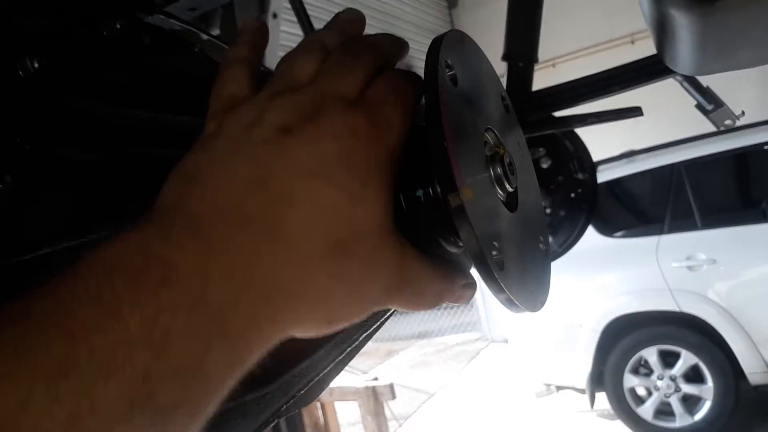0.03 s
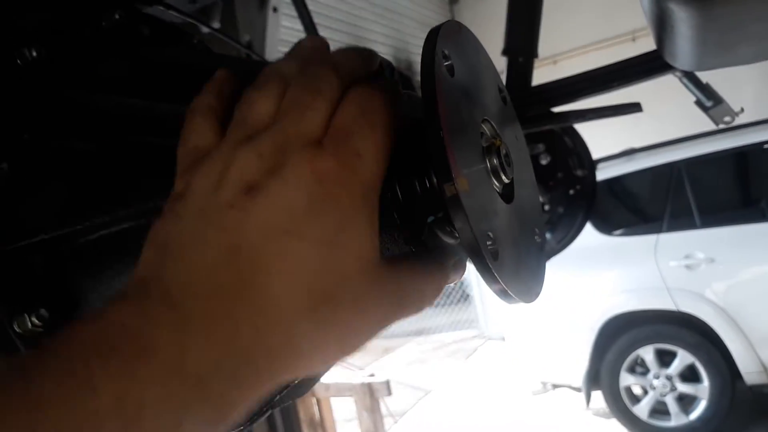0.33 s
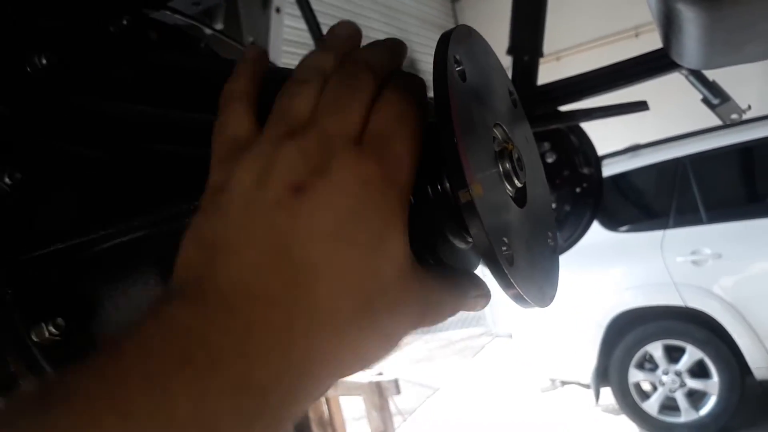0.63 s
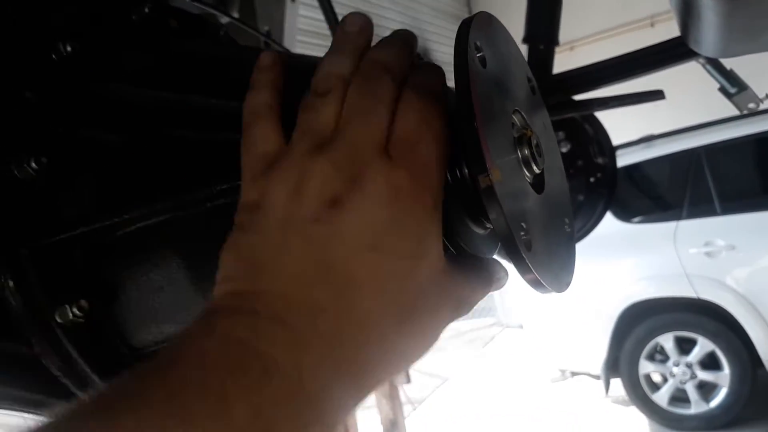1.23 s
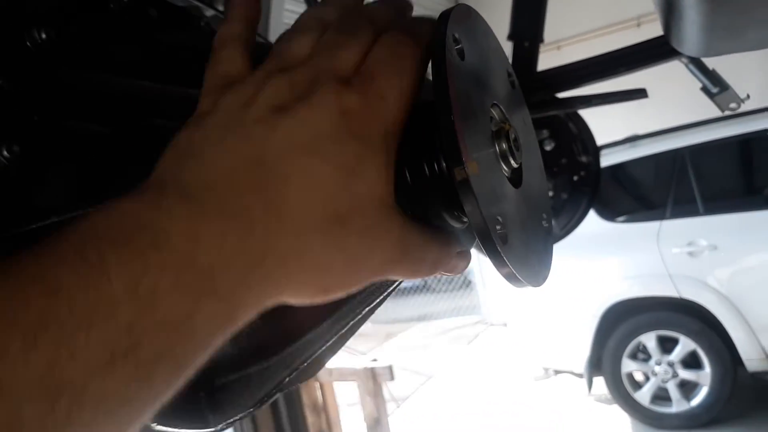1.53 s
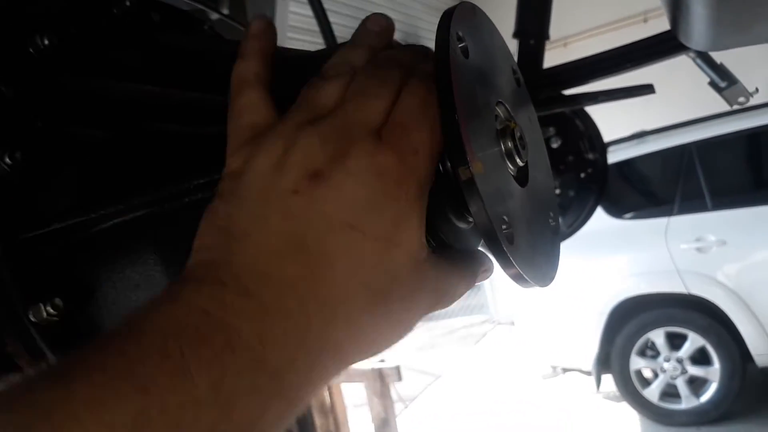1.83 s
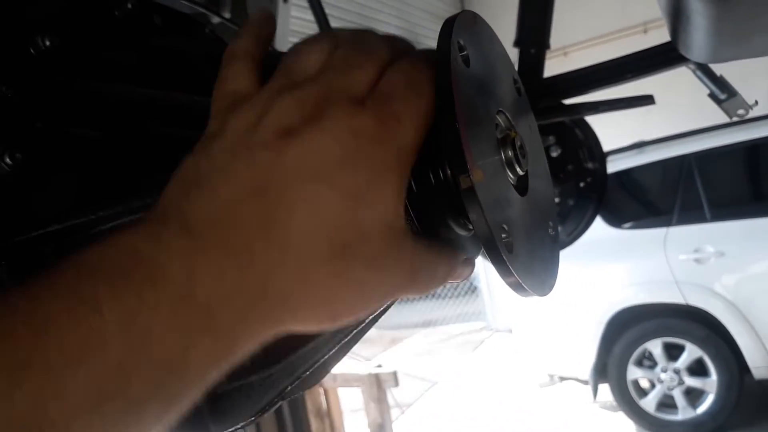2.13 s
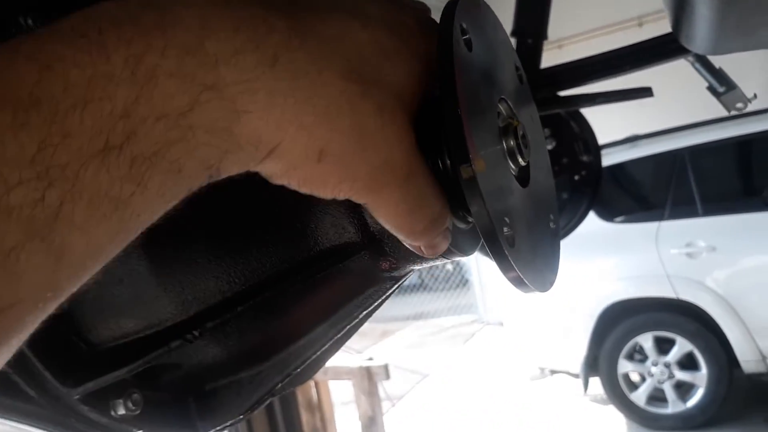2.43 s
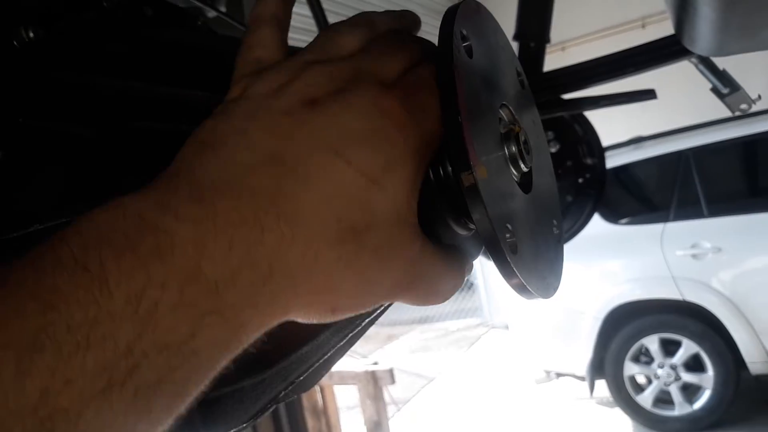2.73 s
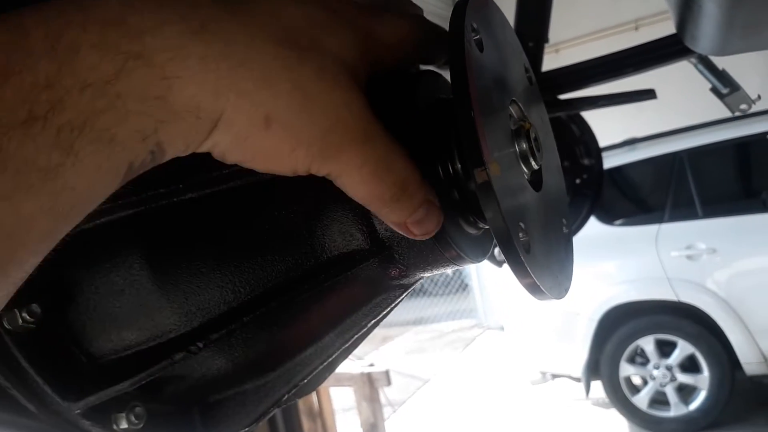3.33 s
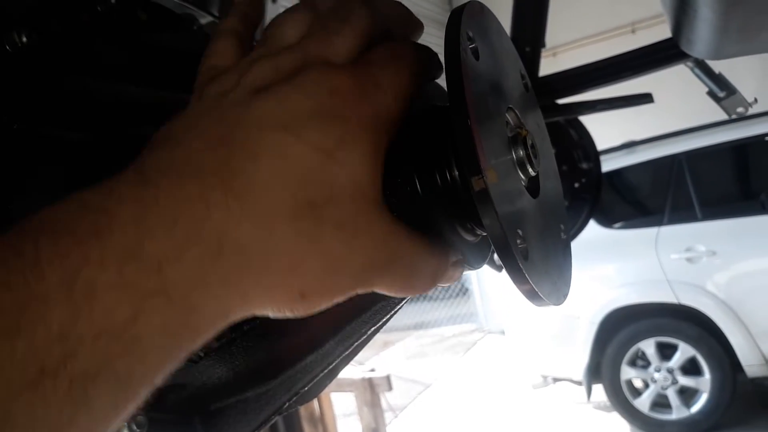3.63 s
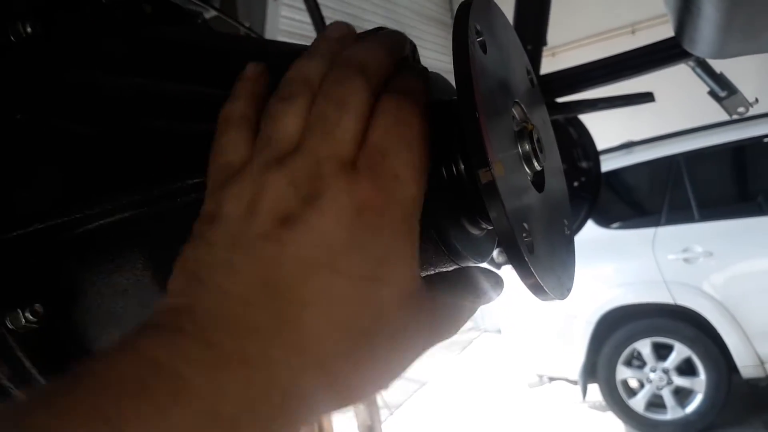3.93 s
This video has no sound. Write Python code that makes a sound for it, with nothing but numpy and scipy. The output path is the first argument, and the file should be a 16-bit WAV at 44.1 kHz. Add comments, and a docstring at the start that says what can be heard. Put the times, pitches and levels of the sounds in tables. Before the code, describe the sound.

Short metal squeaks from a hand-twisted steel flange over a soft ventilation roar.

```python
"""In a workshop, under a vehicle, a hand twists a steel flange back and forth close by.
The dry joint sticks and slips in four short squeaks that ring the metal. The palm brushes the steel,
there is one faint tick, and near the end comes one hissing scuff.
Behind it all the ventilation roars softly, with a hum and a thin whine."""
import sys
import numpy as np
from scipy import signal
from scipy.fft import rfft, irfft
from scipy.io import wavfile
from scipy.ndimage import uniform_filter1d

SR = 44100
rng = np.random.default_rng(int(sys.argv[2]) if len(sys.argv) > 2 else 0)


def waveform_to_disk(signal):
    """Save audio, clipped to [-1, 1], as 16-bit WAV at the path in sys.argv[1]."""
    frames = np.transpose(np.atleast_2d(signal))
    scaled = np.clip(frames, -1, 1) * 32767
    samples = np.round(scaled).astype(np.int16)
    wavfile.write(sys.argv[1], SR, samples)


N = 176400  # 4 seconds

# The tone colour of the fan's roar: frequency_hz, gain_db
ROAR_COLOUR = [(15, -61), (25, -37.5), (108, -11.5), (145, -11.5), (229, -8), (285, -0.5), (405, -5),
               (451, -3), (531, -6.5), (575, -14), (754, -4.5), (818, -11), (911, -11.5), (1100, -0.5),
               (1230, -2.5), (1520, -10), (2280, -5), (2760, -7), (3080, -13.5), (4490, -17.5),
               (5000, -21.5), (6210, -23.5), (7510, -38), (11900, -36), (16000, -48)]
# How loud the roar is: time_s, level_db
ROAR_LEVEL = [(0, -33.5), (.45, -37.5), (.95, -36), (1.3, -34), (1.65, -31), (2.3, -30.5), (2.8, -30.5),
              (3.3, -30.5), (4, -31)]
# How alike the roar is in both ears (1 is the same): frequency_hz, likeness
ROAR_LIKENESS = [(60, 1), (130, .98), (300, 0.97), (480, 0.87), (700, -0.069), (1400, -.25), (3100, -0.12),
                 (6800, 0.083), (15000, -0.14)]
# Which way the roar leans: frequency_hz, left_minus_right_db
ROAR_PAN = [(130, 0.5), (290, 0), (640, -1.5), (1400, -2.5), (3100, -4), (6800, 2.5), (15000, -1)]
# The tones of the hum: pitch_hz, level_db, right_ear_lag_turns
HUM_TONES = [(57, -81, 0), (108, -70.5, 0.07), (122.2, -58.5, 0), (769.3, -45, 0.25)]
# The tones of the whine, compared with the strongest: pitch_hz, gain_db
WHINE_TONES = [(5383, -5.5), (5502, -6), (6035, -4), (6153, 0), (6270, -6), (6690, -9), (6804, -12),
               (6920, -11), (7050, -17)]
# How loud the strongest whine tone is: time_s, level_db
WHINE_LEVEL = [(0, -60), (.5, -56.5), (1.1, -57), (1.5, -54.5), (1.9, -49.5), (2.4, -55.5), (2.8, -52),
               (3.6, -66), (4, -58)]

# The path of each squeak (its pitch is the slips per second): time_s, pitch_hz, level_db
LONG_SQUEAK = [(.052, 1440, -17), (.056, 1345, -12), (.063, 1285, -11.5), (.069, 1222, -15),
               (.081, 1165, -13), (.090, 1090, -11), (.098, 995, -8.5), (.109, 928, -14), (.123, 838, -9.5),
               (.129, 802, -14), (.137, 785, -10), (.150, 738, -17), (.162, 672, -17), (.169, 650, -27)]
THIN_SQUEAK = [(1.346, 1631, -22), (1.351, 1438, -24), (1.357, 1674, -30), (1.365, 1672, -18.5),
               (1.372, 1733, -24), (1.381, 1730, -27), (1.393, 1735, -26), (1.409, 1730, -28.5)]
FIRST_CHIRP = [(2.587, 1150, -25), (2.591, 1010, -18), (2.595, 955, -16.5), (2.602, 915, -19),
               (2.607, 900, -25)]
SECOND_CHIRP = [(2.621, 1090, -25), (2.624, 1040, -19), (2.630, 935, -17.5), (2.635, 880, -17.5),
                (2.642, 853, -15.5), (2.649, 845, -24)]
# The joint's tone colour in a hard grip, a light touch and a quick jerk: frequency_hz, gain_db
METAL = [(300, -60), (700, -21), (1000, -24), (1180, -6), (1450, -12.5), (1700, -15.5), (2300, -8),
         (2600, -18.5), (3350, -10), (3920, 2.5), (4350, -2), (5000, -12.5), (5500, -13.5), (6100, -15.5),
         (6800, -21), (7500, -41), (9000, -28.5), (11200, -17), (13000, -25), (16000, -28)]
LIGHT = [(600, -12), (1700, 2), (3400, 1), (4400, 5.5), (5200, -4.5), (6000, -11), (6900, -5), (7600, -41),
         (8700, -18), (10300, -12.5), (12000, -18), (13800, -12), (16000, -21)]
JERK = [(500, -37), (1000, -19.5), (1850, -9), (2300, -6), (2700, -9.5), (3500, -4.5), (4200, 3.5),
        (4800, -7), (5500, -16), (6700, -19.5), (7500, -33), (9000, -29.5), (11500, -19.5), (13000, -23),
        (16000, -34)]
# The four squeaks: path, tone_colour, jitter_share, grit_db
SQUEAKS = [(LONG_SQUEAK, METAL, .011, -12), (THIN_SQUEAK, LIGHT, .008, -6), (FIRST_CHIRP, JERK, .012, -7),
           (SECOND_CHIRP, JERK, .012, -8)]
# The notes the flange rings at (a fade is the time to drop 60 dB): pitch_hz, gain_db, fade_s
FLANGE_NOTES = [(3580, -20, .5), (3850, -17, .55), (3670, -6, 0.62), (4220, -18, 0.36), (4200, -15, 0.29),
                (4360, -12, .4)]
# How far a squeak's wave is ahead in the left ear: frequency_hz, lead_radians
SQUEAK_LEAD = [(1300, 1), (1850, 1.94), (2400, -0.5), (3400, -3), (3900, 1.73), (4300, 1.66), (5000, 2.5),
               (6000, 5.5), (6900, 7), (16000, 13)]
# Which way the squeaks lean: frequency_hz, left_minus_right_db
SQUEAK_PAN = [(1000, -2), (2800, -4), (3900, -.5), (4400, 2), (5200, -1), (6400, 3), (12000, 1)]

# The palm brushing the flange: peak_s, half_width_s, level_db
BRUSHES = [(.67, 0.065, -60), (.80, 0.056, -63), (1.79, .05, -63), (2.92, .05, -56), (3.848, .05, -59)]
# The tone colour of the brushing: frequency_hz, gain_db
BRUSH_COLOUR = [(2000, -20), (6000, -5), (8000, -6), (11000, 2), (16000, -2)]
# How loud the scuff is: time_s, level_db
SCUFF_LEVEL = [(3.235, -62), (3.255, -30), (3.272, -19.5), (3.290, -22), (3.312, -25), (3.335, -22.5),
               (3.368, -23), (3.41, -26.5), (3.48, -32), (3.56, -38), (3.72, -45.5)]
# The tone colour of the scuff: frequency_hz, gain_db
SCUFF_COLOUR = [(100, -32), (320, -2.5), (700, -8.5), (1000, -15), (1800, -8.5), (2600, 3.5), (3300, -0.5),
                (4500, -0.5), (5500, -3.5), (6900, -8.5), (7700, -26), (9500, -31), (12000, -26.5),
                (14000, -32), (16000, -47)]

TIME_S = np.arange(N) / SR
TREBLE_LIMIT_HZ = 15900
ATTACK_S, RELEASE_S = 0.0011, 0.0014
CATCH_S, CATCH_DB = 0.014, -9  # each squeak starts gritty before the slips lock in
SHIMMER_S, SHIMMER_DB = .011, 3.2  # overtones trade strength as the contact shifts


def amp(db):
    """Turns decibels into a number to multiply by."""
    return 10 ** (np.asarray(db) / 20)


def unit(x):
    """Scales a signal to an average strength (rms) of 1."""
    return x / np.sqrt(np.mean(x ** 2) + 1e-20)


def per_frequency(table, x):
    """Looks up a table's value for every frequency in x, on a scale of octaves."""
    hz, value = np.transpose(table)
    return np.interp(np.log(np.fft.rfftfreq(x.shape[-1], 1 / SR) + 1), np.log(hz), value)


def level(table):
    """Joins time_s, level_db points into a volume curve."""
    return amp(np.interp(TIME_S, *np.transpose(table)))


def colour(x, table, share=1):
    """Turns each frequency up or down by a share of the table's decibels."""
    return irfft(rfft(x) * amp(share * per_frequency(table, x)), x.shape[-1])


def pan(x, table):
    """Leans each frequency to the left or right."""
    return colour(x, table, share=np.array([[.5], [-.5]]))


def wander(hz):
    """A smooth random wobble of strength 1, up to about hz wiggles a second."""
    keep = 1 / (1 + (np.fft.rfftfreq(N, 1 / SR) / hz) ** 4)
    return unit(irfft(rfft(rng.standard_normal(N)) * keep, N))


def fan_roar():
    """The fan's rushing air: a broad noise, alike in both ears in the bass."""
    left, other = rng.standard_normal((2, N))
    likeness = np.clip(per_frequency(ROAR_LIKENESS, left), -1, 1)
    right = irfft(likeness * rfft(left) + np.sqrt(1 - likeness ** 2) * rfft(other), N)
    air = pan(colour(np.array([left, right]), ROAR_COLOUR), ROAR_PAN)
    return unit(air) * level(ROAR_LEVEL) * amp(0.9 * wander(hz=27))


def hum():
    """The ventilation's hum: pure tones that waver a little in pitch and loudness."""
    out = 0
    for hz, db, lag in HUM_TONES:
        turns = np.cumsum(hz + 1.29 * wander(hz=6)) / SR
        peak = np.sqrt(2) * amp(db + 1.25 * wander(hz=15))
        out += peak * np.sin(2 * np.pi * np.array([turns, turns - lag]))
    return out


def whine():
    """A cluster of thin machine tones that flutter differently in each ear."""
    out = np.zeros((2, N))
    for hz, db in WHINE_TONES:
        for ear in out:
            flutter = 1 + .55 * (wander(hz=16) + 1j * wander(hz=16))
            tone = np.exp(2j * np.pi * (hz * TIME_S + rng.random()))
            ear += amp(db) * unit((flutter * tone).real)
    return out * level(WHINE_LEVEL)


def squeak(path, tone_colour, jitter_share, grit_db):
    """The dry joint sticks and slips so fast that it makes a tone, with a puff of grit on each slip."""
    times, pitches, levels = np.transpose(path)
    start, end = times[0], times[-1]
    active = (TIME_S > start - .02) & (TIME_S < end + .02)
    t = TIME_S[active]
    age = t - start
    pitch = np.interp(t, times, pitches)
    roughness = (1100 / pitch) ** 2  # slower slips are more uneven
    slip_hz = pitch * (1 + jitter_share * roughness * wander(hz=370)[active])
    turns = np.cumsum(slip_hz) / SR
    slips = 0
    for k in range(1, 25):  # the tone and its overtones
        shimmer = np.interp(age / SHIMMER_S, np.arange(20), rng.uniform(-1, 1, 20) * np.sqrt(3))
        wave = np.cos(2 * np.pi * (k * turns + rng.random()))
        slips += amp(SHIMMER_DB * shimmer) * wave * (k * slip_hz < TREBLE_LIMIT_HZ)
    grit = unit((1 + np.cos(2 * np.pi * turns)) * rng.standard_normal(N)[active])
    catch = amp(CATCH_DB) * np.exp(-np.maximum(age, 0) / CATCH_S)
    voice = colour(unit(slips) + grit * (amp(grit_db) * roughness + catch), tone_colour)
    voice /= np.sqrt(uniform_filter1d(voice ** 2, size=500) + 1e-12)  # even out the loudness
    fade_in = np.clip(age / ATTACK_S + .5, 0, 1)
    fade_out = np.clip((end - t) / RELEASE_S + .5, 0, 1)
    out = np.zeros(N)
    out[active] = voice * fade_in * fade_out * amp(np.interp(t, times, levels))
    return out


def ringing(x):
    """Shaken by x, the steel rings on at its own notes."""
    t = np.arange(SR // 2) / SR
    ring = 0
    for hz, db, fade_s in FLANGE_NOTES:
        fade = amp(-60 * t / fade_s)
        wave = np.cos(2 * np.pi * (hz * t + rng.random((2, 1))))
        ring += 2 * amp(db) * fade / fade.sum() * wave
    return signal.fftconvolve(x[None], ring, axes=1)[:, :N]


def echoes(x, fade_s, delay_s):
    """Sound bounces back as many tiny echoes, different for each ear."""
    t = np.arange(SR) / SR
    tail = rng.standard_normal((2, SR)) * amp(-60 * t / fade_s) * (t > delay_s)
    tail /= np.linalg.norm(tail, axis=1, keepdims=True)
    return signal.fftconvolve(x[None], tail, axes=1)[:, :N]


def flange():
    """The squeaks ring the flange and bounce off the vehicle's underside and around the workshop."""
    squeaks = sum(squeak(*row) for row in SQUEAKS)
    ear_shift = np.exp(np.array([[.5j], [-.5j]]) * per_frequency(SQUEAK_LEAD, squeaks))
    direct = irfft(rfft(squeaks) * ear_shift, N)
    ring = ringing(squeaks)
    underside = amp(-4) * echoes(squeaks, fade_s=.022, delay_s=.0006)
    workshop = amp(-18) * echoes(squeaks, fade_s=.43, delay_s=.011)
    return pan(direct + ring + underside + workshop, SQUEAK_PAN)


def palm_brushes():
    """Skin slides over steel in faint, high swishes."""
    hiss = unit(colour(rng.standard_normal((2, N)), BRUSH_COLOUR))
    swells = sum(amp(db) * np.exp(-((TIME_S - peak_s) / width) ** 2) for peak_s, width, db in BRUSHES)
    return hiss * swells


def tick(start_s=2.022, level_db=-40, fade_s=.012):
    """One faint, bright tick: a burst of noise that dies at once."""
    age = TIME_S - start_s
    return rng.standard_normal((2, N)) * (age > 0) * amp(level_db - 60 * abs(age) / fade_s)


def scuff():
    """A dry sliding hiss of fine grains that starts quickly and trails away."""
    grains = rng.standard_normal((2, N)) * np.exp(0.11 * wander(hz=300))
    started = TIME_S > SCUFF_LEVEL[0][0]
    return unit(colour(grains, SCUFF_COLOUR)) * level(SCUFF_LEVEL) * started


def scene():
    """Adds all the sounds together, for the left and right ear."""
    return fan_roar() + hum() + whine() + flange() + palm_brushes() + tick() + scuff()


def record(dry):
    """Clips any peak that is too loud and cuts the very highest treble."""
    treble_cut = signal.firwin(511, TREBLE_LIMIT_HZ, window=("kaiser", 9), fs=SR)
    return signal.oaconvolve(np.clip(dry, -.92, .92), treble_cut[None], "same")


dry = scene()
out = record(dry)
waveform_to_disk(out)
```